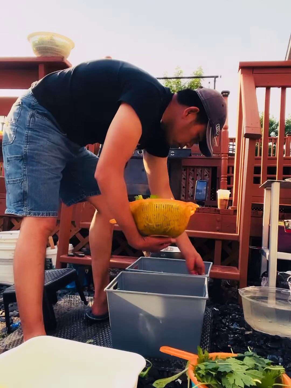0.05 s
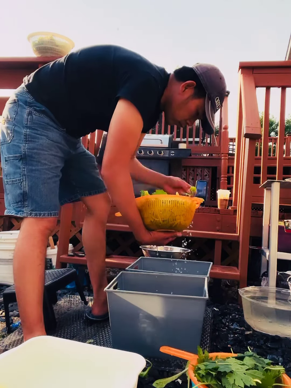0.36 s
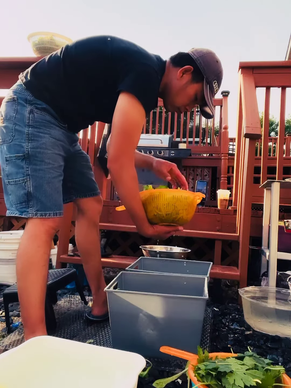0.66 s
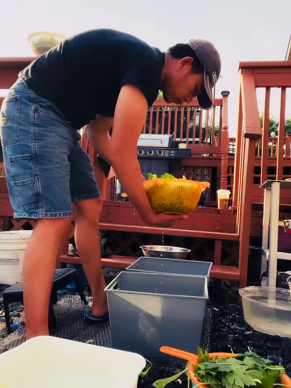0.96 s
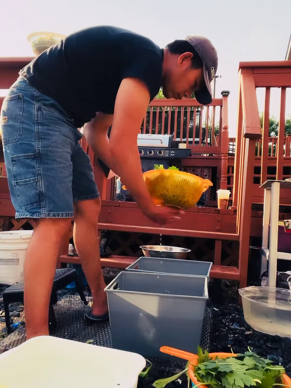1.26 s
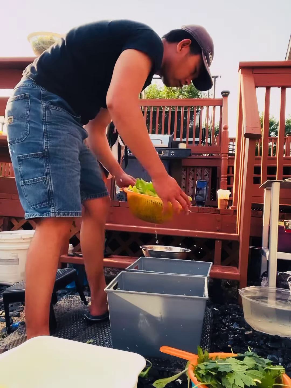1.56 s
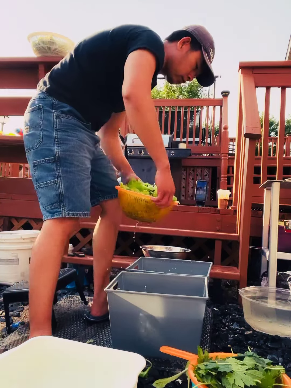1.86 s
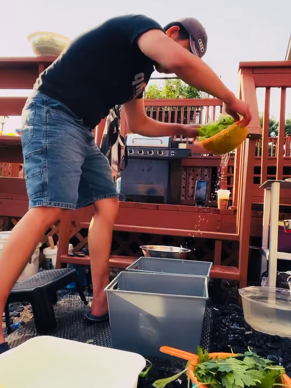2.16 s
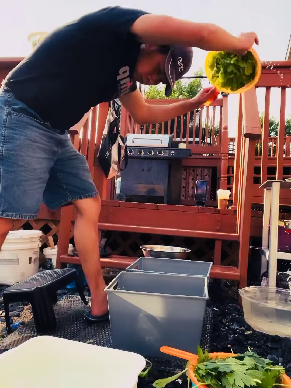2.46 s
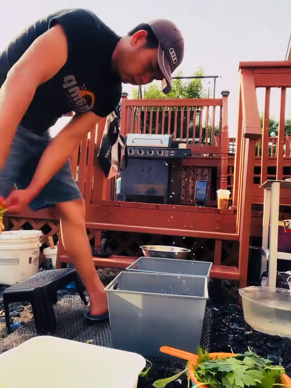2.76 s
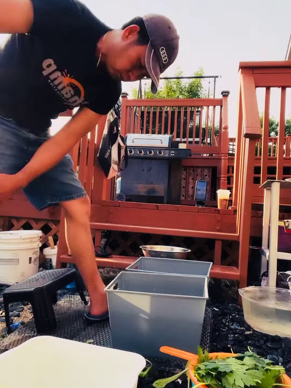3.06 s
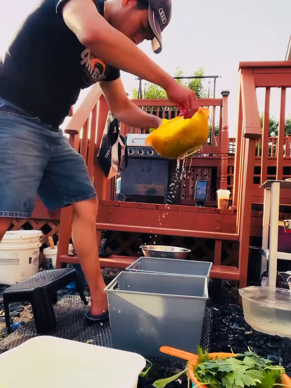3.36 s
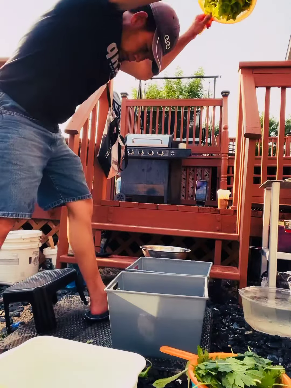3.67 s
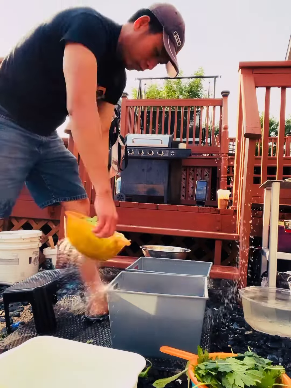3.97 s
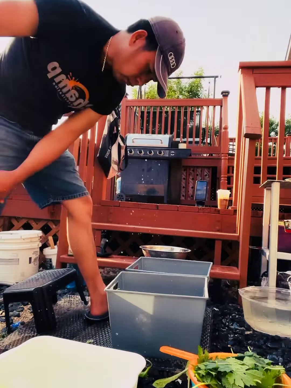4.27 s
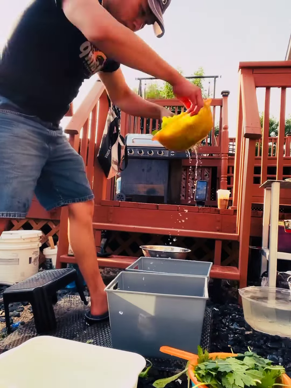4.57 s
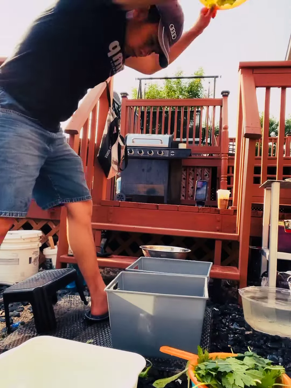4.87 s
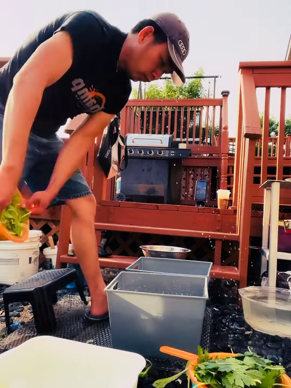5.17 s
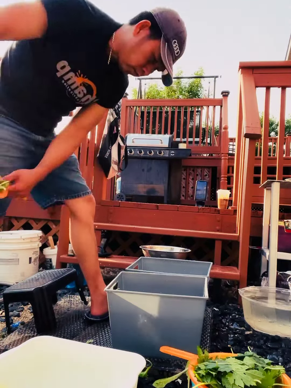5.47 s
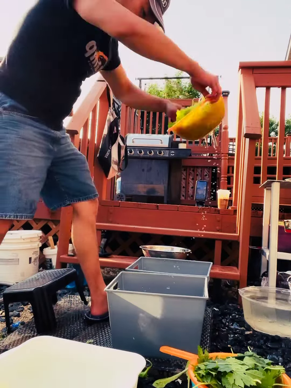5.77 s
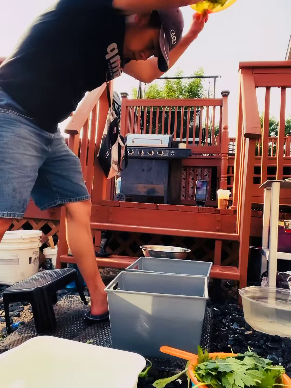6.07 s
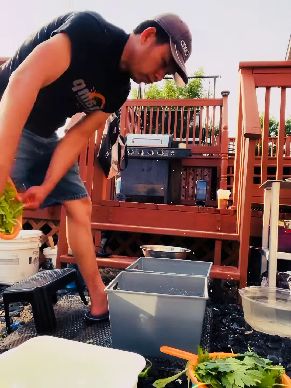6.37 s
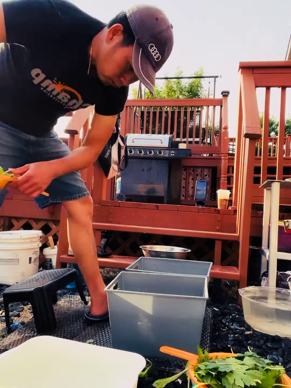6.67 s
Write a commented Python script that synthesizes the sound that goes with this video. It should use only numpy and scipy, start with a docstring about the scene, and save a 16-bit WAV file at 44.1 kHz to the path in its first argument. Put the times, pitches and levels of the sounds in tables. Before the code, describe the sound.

Water drips from wet lettuce in a plastic colander, then four swings slap the leaves and fling spattering water, over a low outdoor rumble.

```python
"""Water trickles and drips close to the microphone, from rinsed lettuce in a plastic colander held over
tubs in a back yard. Far off a vehicle drones and fades, over the low rumble of the town.
A few drops trap ringing bubbles, and wet fingers squeak on the bowl. Then the colander is swung four
times: a swish, the slap of the leaves into the bowl, their slosh, and the flung water spattering down."""
import sys
import numpy as np
from scipy import signal
from scipy.fft import rfft, irfft, next_fast_len
from scipy.io import wavfile

SR = 44100
rng = np.random.default_rng(int(sys.argv[2]) if len(sys.argv) > 2 else 0)


def wav_out(sig):
    """Save sig, one row per channel (or a flat mono array), as 16-bit PCM at SR to the path in sys.argv[1]."""
    wavfile.write(sys.argv[1], SR, np.round(np.clip(np.atleast_2d(sig).T, -1, 1) * 32767).astype(np.int16))


N = 296352
TIME = np.arange(N) / SR

# Spells of heavier trickling. Each row: peak time in seconds, level in dB, half-length in seconds.
TRICKLE_SPELLS = [(.1, -73, 0.15), (.66, -68.5, 0.063), (1.609, -65.5, .06), (2.499, -68.5, 0.21),
                  (3.287, -56.5, 0.25), (4.43, -57.5, 0.18), (5.563, -64, 0.25), (6.58, -67.5, 0.26)]
# The far engine's firing rate. Each row: time in seconds, rate in Hz.
FIRING_RATE = [(0, 101.3), (.5, 96.95), (.8, 75.1), (1.8, 74.65), (2.05, 78.64), (2.55, 75.55), (2.7, 62)]
# The strength of its drone. Each row: time in seconds, level in dB.
FIRING_LEVEL = [(0.0, -39.5), (0.48, -50), (0.51, -37), (1.2, -57), (1.3, -41), (1.71, -61), (1.76, -40.5),
                (2.43, -47.5), (2.56, -34.5), (2.6, -55)]
# The loudest single drops. Each row: start in seconds, level in dB, centre in Hz, width in octaves.
LOUD_DRIPS = [(.187, -61, 8200, 0.3), (.26, -59, 2650, 1.4), (.302, -59, 5060, 0.23),
              (.399, -57, 2970, 1.6), (0.631, -55.5, 3900, 2), (0.712, -55.5, 8450, 0.99),
              (1.191, -51.5, 3220, 2.4), (1.356, -43.5, 3660, 0.12), (1.903, -47, 1690, 1.05),
              (1.936, -43.5, 2760, 0.69), (1.975, -55.5, 7440, 0.29), (2.233, -56.5, 4670, .7),
              (2.279, -52, 2670, 1.9), (2.359, -46, 1250, .8), (2.456, -54.5, 2335, 0.79),
              (2.969, -45, 2844, 0.37), (3.047, -52, 4200, 1.5), (3.133, -58, 3840, 3.4),
              (3.539, -50.5, 5600, 1.6), (4.292, -54.5, 3680, 2.1), (4.358, -46.5, 2740, 1.9),
              (4.398, -50, 5000, 1.8), (4.592, -48, 8050, 1.9), (4.655, -44.5, 8400, 1.3),
              (4.769, -55.5, 7500, 2.4), (5.388, -50, 1570, .34), (5.518, -56, 3670, 2.7),
              (5.801, -55, 9760, 1.1), (5.946, -55.5, 3180, 1.5)]
# Bubbles trapped by drops. Each row: start in seconds, level in dB, pitch in Hz, t60 in seconds.
BUBBLES = [(.510, -51.5, 1090, 0.1), (1.191, -39, 2340, 0.02), (1.356, -40.5, 3816, 0.019),
           (2.967, -41, 2850, 0.017), (3.004, -43, 2024, 0.036), (3.015, -35, 1570, 0.041)]
# Wet skin and leaves rub the plastic. Each row: start and length in seconds, level in dB, first, middle
# and last pitch in Hz, first overtone in dB against the fundamental, roughness from 0 to 1.
RUBS = [(.632, 0.04, -50.5, 1480, 1640, 1900, -12, 0.22), (1.019, 0.045, -48, 1120, 1317, 1410, -25, 0.37),
        (1.643, 0.017, -44, 5300, 4870, 2930, -16, 0.2), (1.656, 0.022, -52, 2350, 2310, 2350, -2, 0.75),
        (1.668, 0.053, -47, 3800, 4260, 4230, 1.5, 0.47), (2.482, 0.043, -37.5, 538, 541, 570, -30, .1),
        (2.518, 0.059, -47, 757, 1162, 1525, -29.5, 0.48)]
# Leaves slump against the bowl. Each row: time in seconds, level in dB, relative bowl ring in dB.
LEAF_SLUMPS = [(1.915, -50, -5), (2.633, -40, -19), (2.698, -39, -4), (3.889, -42, -20)]
# The swings. Each row: slap time in seconds, water left in dB, slap level in dB, slap rise and t60 in
# seconds, relative bowl ring in dB, slosh t60 and spray flight in seconds, spray tilt in dB per octave.
COLANDER_SWINGS = [(2.716, -0.5, -32, 0.025, 0.21, -4, 0.29, 0.11, 1.5),
                   (3.931, -1.5, -26.5, 0.0052, 0.076, -8.5, 0.52, 0.12, 0),
                   (5.095, -3.5, -29, 0.0086, 0.045, -14, 0.4, 0.12, 0.6),
                   (6.287, -4.5, -30, .013, 0.056, -9, 0.24, 0.12, 0)]
# Fat blobs among the spray. Each row: landing time in seconds, level in dB, tilt in dB per octave.
WATER_BLOBS = [(2.818, -32, 5), (4.031, -33, 2), (4.109, -49, -1), (4.146, -37, -0.5), (5.144, -30.5, 1),
               (5.186, -25.5, 7), (6.373, -37, 2.5), (6.385, -50, 5)]
# The colander and the hollow tub ring. Each row: pitch in Hz, relative level in dB, t60 in seconds.
BOWL_MODES = [(248, -2.5, 0.09), (412, -4.5, 0.044), (583, -23, 0.033), (1130, -5, 0.014), (1183, 3, 0.017),
              (1390, -8.5, 0.057), (1700, -2.5, 0.051), (1870, 0.5, 0.012), (2940, -28, 0.038),
              (3828, 1.5, 0.015)]
TUB_MODES = [(621, -7, 0.013), (833, 3, 0.016), (7360, 23, 0.0018), (7740, 18, 0.008)]
# The tone colour of each source. Each row: frequency in Hz, relative spectral density in dB.
TRICKLE_SPECTRUM = [(350, -9), (650, 1.5), (1500, -1), (3300, -3), (4700, -9), (8500, -7.5), (11000, -13.5),
                    (16000, -13.5)]
RUMBLE_SPECTRUM = [(15, -47), (25, -28), (31, -13), (39, -5), (50, -1), (60, 3), (80, -2.5), (100, 0),
                   (125, -4.5), (160, -5), (200, -15), (260, -17.5), (340, -49), (600, -69.5)]
HISS_SPECTRUM = [(160, -24), (280, 0), (400, -2), (542, -5), (620, -8.5), (786, -9), (900, -9),
                 (1330, -12.5), (1830, -19.5), (2130, -22), (2360, -25.5), (3430, -22.5), (4980, -24),
                 (7860, -21.5), (16000, -35)]
SLAP_SPECTRUM = [(100, -34), (200, -8), (480, 4.5), (720, -11.5), (1100, 2.5), (2100, 2.5), (3600, 3.5),
                 (5400, 1), (6300, -5.5), (8600, 0.5), (11000, -8), (14000, -0.5), (16000, -9.5)]
SWISH_SPECTRUM = [(240, -62), (400, -24), (545, 5), (2180, 1), (5600, -5), (6640, -13), (7630, -5.5),
                  (16000, -17.5)]
SPRAY_SPECTRUM = [(150, -16), (300, -10), (800, 0), (1200, -0.5), (2000, -3), (3800, -4.5), (5500, -15),
                  (6900, -4.5), (8000, 9.5), (9000, 4), (9800, -1.5), (14700, -4.5), (16000, -3)]
# Pitch bands of the droplets, wider towards the treble.
EDGES_HZ = np.linspace(np.sqrt(150), np.sqrt(17000), 15) ** 2
BANDS = [signal.butter(2, pair, "band", fs=SR, output="sos") for pair in zip(EDGES_HZ, EDGES_HZ[1:])]


def from_db(db):
    """Decibels to gain."""
    return 10 ** (np.asarray(db) / 20)


def rms_one(x):
    """Scale to unit power."""
    return x / np.sqrt(np.mean(x ** 2) + 1e-20)


def drift(per_s):
    """A random wander through per_s points a second; rms 1."""
    knots = rng.standard_normal(N // 8)
    return rms_one(np.interp(TIME * per_s, np.arange(len(knots)), knots))


def add(out, s, sound):
    """Mix a sound in from s seconds."""
    at = max(round(s * SR), 0)
    out[at:at + len(sound)] += sound[:max(N - at, 0)]


def coloured(x, spectrum, tilt_db=0):
    """Causal filter with this spectrum, tilted per octave; keeps the power of white noise."""
    size = next_fast_len(len(x) + 4096, real=True) // 2 * 2
    octave = np.log2(np.maximum(np.arange(size // 2 + 1) * SR / size, 1))
    hz, db = np.transpose(spectrum)
    curve_db = np.interp(octave, np.log2(hz), db) + tilt_db * np.maximum(octave, np.log2(hz[0]))
    cepstrum = irfft(np.log(rms_one(from_db(curve_db)) + 1e-9))
    cepstrum[1:size // 2] *= 2  # fold to minimum phase
    cepstrum[size // 2 + 1:] = 0
    return irfft(rfft(x, size) * np.exp(rfft(cepstrum)), size)[:len(x)]


def grains(per_s, spread_db, mist, size):
    """Random tiny impacts, mostly weak and a few strong, over a mist of finer ones; rms 1."""
    chance, noise = rng.random(size) * SR / per_s, rng.standard_normal(size)
    born, clicks = chance < 1, np.zeros(size)
    clicks[born] = np.sign(noise[born]) * from_db(spread_db * np.minimum(-np.log(chance[born]), 4))
    return rms_one(rms_one(clicks) + mist * noise)


def droplets(per_s, spread_db, mist, size):
    """Pitched grains about a millisecond long, per_s a second in each band; rms 1."""
    return rms_one(sum(signal.sosfilt(band, grains(per_s, spread_db, mist, size)) for band in BANDS))


def swell(t, rise, t60, hold=0, bend=1.8):
    """Climbs 20 dB in the rise time to a peak at t = 0, holds, then falls 60 dB every t60."""
    return from_db(np.where(t < 0, -20 * np.abs(t / rise) ** bend, -60 * np.maximum(t - hold, 0) / t60))


def ring(contacts, modes, coupling_db):
    """A struck body: every contact starts a dying sine in each mode."""
    out = np.zeros(len(contacts))
    for hz, db, t60 in modes:
        radius, angle = from_db(-60 / (t60 * SR)), 2 * np.pi * hz / SR
        feedback = [1, -2 * radius * np.cos(angle), radius * radius]
        out += from_db(coupling_db + db) * signal.lfilter([0, np.sin(angle)], feedback, contacts + 1e-18)
    return out


def trickle(steady_db=-68):
    """Close by, small drops patter on the tubs and the ground, in spells that swell and ebb."""
    spells = sum(from_db(db) * np.exp(-((TIME - s) / half) ** 2) for s, db, half in TRICKLE_SPELLS)
    patter = droplets(per_s=220, spread_db=3.5, mist=0.83, size=N)
    return coloured((from_db(steady_db) + spells) * patter, TRICKLE_SPECTRUM)


def vehicle(pipe_db=-59, pipe_hz=235, half_width_hz=23, fade_start_s=2.9, fade_db_per_s=62):
    """Far off, an exhaust drones, drops in pitch at a gear change and fades away."""
    hz = np.interp(TIME, *np.transpose(FIRING_RATE))
    db = np.interp(TIME, *np.transpose(FIRING_LEVEL))
    phase = 2 * np.pi * np.cumsum(hz * (1 + 0.01 * drift(14.86))) / SR
    firing = from_db(db) * (np.sin(phase) + from_db(-23.5) * np.sin(2 * phase))
    # The third harmonic is loudest near the resonance of the exhaust pipe.
    pipe = from_db(pipe_db) / np.hypot(1, (3 * hz - pipe_hz) / half_width_hz) * np.sin(3 * phase)
    fade = from_db(-fade_db_per_s * np.maximum(TIME - fade_start_s, 0))
    return np.sqrt(2) * fade * (firing + pipe)


def town(rumble_db=-44, hiss_db=-57):
    """Beyond the yard, the low rumble and far hiss of traffic."""
    rumble = from_db(rumble_db) * coloured(rng.standard_normal(N), RUMBLE_SPECTRUM)
    hiss = from_db(hiss_db) * coloured(rng.standard_normal(N), HISS_SPECTRUM)
    return rumble + hiss


def faint_drips(count, db=-64.5, hz=3900, width_octaves=1.2):
    """Stray drops at random moments, a little varied in level and pitch; rows as in LOUD_DRIPS."""
    return [(abs(when) * N / SR, db + 0.5 * loud, hz * 2 ** (0.3 * high), width_octaves)
            for when, loud, high in rng.uniform(-1, 1, (count, 3))]


def drips(skirt_db=-19, crack_t60=0.021, splat_db=-2):
    """A drop hits with a crack and a short splat, pitched by the spot that it lands on."""
    out, t = np.zeros(N), TIME[:SR // 4]
    for s, db, hz, octaves in LOUD_DRIPS + faint_drips(count=20):
        splat_t60 = 0.029 + 0.07 * octaves  # a wider splat also lasts longer
        edges = np.clip(hz * 2 ** (np.array([-.5, .5]) * max(octaves, .1)), 100, .45 * SR)
        force = from_db(-60 * t / crack_t60) + from_db(splat_db - 60 * t / splat_t60)
        burst = force * rng.standard_normal(len(t))
        pitched = signal.sosfilt(signal.butter(2, edges, "band", fs=SR, output="sos"), burst)
        pitched *= np.linalg.norm(force) / np.linalg.norm(pitched)
        add(out, s, from_db(db) * (pitched + from_db(skirt_db) * burst))
    return out


def plinks(climb_per_s=0.73, attack_s=.0005):
    """A trapped bubble rings and rises a little in pitch as it nears the surface."""
    out, t = np.zeros(N), TIME[:SR // 4]
    attack = -np.expm1(-t / attack_s)
    for s, db, hz, t60 in BUBBLES:
        tone = np.sin(2 * np.pi * hz * t * (1 + climb_per_s * t / 2))
        add(out, s, from_db(db - 60 * t / t60) * attack * tone)
    return out


def squeaks(overtone_fall_db=7, attack_s=.004, slacken_db=9):
    """Stick-slip on wet plastic: the pitch jitters and the grip flutters, more so on a rough rub."""
    out = np.zeros(N)
    jitter, grip_db = .13 * drift(2200), 7 * drift(450)
    for s, length, db, *pitches, overtone_db, rough in RUBS:
        span = slice(round(s * SR), round((s + length) * SR))
        t = TIME[span] - s
        hz = np.interp(t, [0, length / 2, length], pitches)
        phase = 2 * np.pi * np.cumsum(hz * (1 + rough * jitter[span])) / SR
        overtones = sum(from_db(overtone_db - overtone_fall_db * k) * np.sin((k + 2) * phase)
                        for k in range(3))
        catch = np.clip(t / attack_s, 0, 1)
        slacken = from_db(-slacken_db * t / length) * signal.windows.tukey(len(t), .08)
        out[span] += catch * slacken * from_db(db + rough * grip_db[span]) * (np.sin(phase) + overtones)
    return out


def slaps(coupling_db=-23.5, slosh_db=-31.5, slosh_lag_s=.023):
    """Wet leaves slump or slap into the bowl and set it ringing; a brighter slosh follows each slap."""
    out, t = np.zeros(N), TIME[:SR // 3] - .07
    # Each hit: time in seconds, level in dB, envelope, bowl ring in dB, tilt in dB per octave.
    hits = [(s, db, swell(t, rise=0.013, t60=0.13), bowl_db, -4) for s, db, bowl_db in LEAF_SLUMPS]
    for s, water_db, slap_db, rise, t60, bowl_db, slosh_t60, *_ in COLANDER_SWINGS:
        hits.append((s, slap_db, swell(t, rise, t60, hold=.008), bowl_db, -0.15))
        hits.append((s + slosh_lag_s, slosh_db + water_db, swell(t, rise=0.0083, t60=slosh_t60), -32, 3))
    for s, db, envelope, bowl_db, tilt_db in hits:
        contacts = droplets(per_s=3300, spread_db=6.0, mist=0.76, size=len(t)) * envelope
        bowl = ring(contacts, BOWL_MODES, coupling_db + bowl_db)
        add(out, s + t[0], from_db(db) * (coloured(contacts, SLAP_SPECTRUM, tilt_db) + bowl))
    return out


def swishes(db=-45.5, lead_s=0.043):
    """A soft, grainy rustle grows as each swing gathers speed, peaking just ahead of the slap."""
    speed = sum(from_db(db + water_db) * swell(TIME - s + lead_s, rise=0.097, t60=0.84)
                for s, water_db, *_ in COLANDER_SWINGS)
    return coloured(speed * grains(per_s=5400, spread_db=1.5, mist=1, size=N), SWISH_SPECTRUM)


def sprays(sheet_db=-26):
    """Each flung sheet lands as droplets and blobs, each with its own brightness; some drum on the tub."""
    out, t = np.zeros(N), TIME[:SR // 3] - .125
    sheet = swell(t, rise=0.028, t60=0.24, hold=0.0063)
    blob = swell(t, rise=0.0021, t60=0.042)
    landings = [(s + flight, sheet_db + water_db, sheet, tilt_db)
                for s, water_db, *_, flight, tilt_db in COLANDER_SWINGS]
    landings += [(s, db, blob, tilt_db) for s, db, tilt_db in WATER_BLOBS]
    for s, db, envelope, tilt_db in landings:
        spatter = droplets(per_s=1000, spread_db=4.5, mist=0.2, size=len(t)) * envelope
        tub = ring(spatter, TUB_MODES, coupling_db=-37)
        add(out, s + t[0], from_db(db) * (coloured(spatter, SPRAY_SPECTRUM, tilt_db) + tub))
    return out


def yard(x, echo_db=-13.0, t60=.13, dull_hz=7000):
    """Tubs, steps and railings scatter a short cloud of echoes back to the microphone."""
    t = TIME[:SR // 3]
    decay = from_db(-60 * t / t60) * (t > .002)
    echoes = grains(per_s=1800, spread_db=6.5, mist=0.6, size=len(t)) * decay
    echoes = signal.sosfilt(signal.butter(1, dull_hz, fs=SR, output="sos"), echoes)
    return x + from_db(echo_db) * signal.fftconvolve(x, echoes / np.linalg.norm(echoes))[:N]


def scene():
    """One microphone in the yard: the colander close up, the vehicle and the town in the distance."""
    near = slaps() + sprays() + swishes() + trickle() + drips() + plinks() + squeaks()
    return (yard(near) + vehicle() + town())[None]


def record(dry):
    """The small microphone loses the deepest bass; the top is cut steeply."""
    low_cut = signal.butter(6, 31, "high", fs=SR, output="sos")
    high_cut = signal.ellip(10, .1, 70, 15900, fs=SR, output="sos")
    return signal.sosfilt(high_cut, signal.sosfilt(low_cut, dry))


dry = scene()
out = record(dry)
wav_out(out)
```